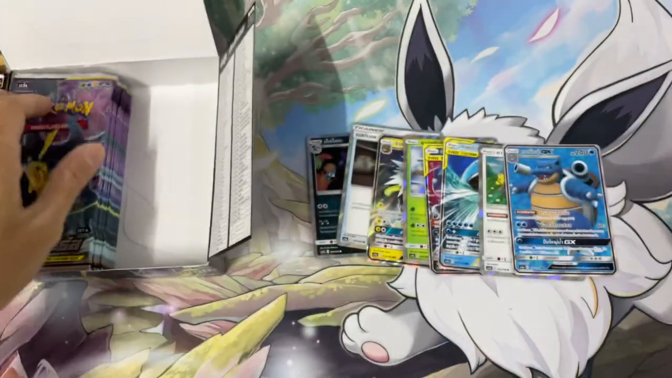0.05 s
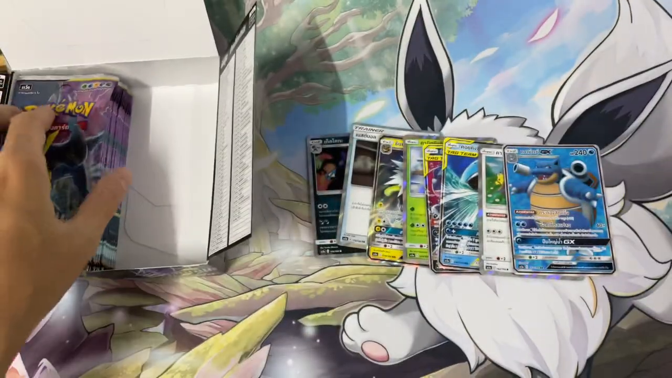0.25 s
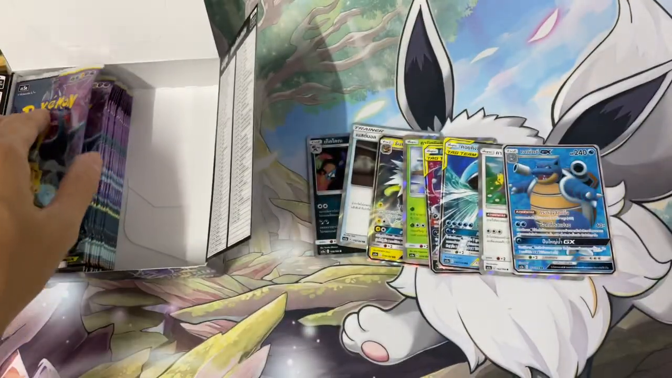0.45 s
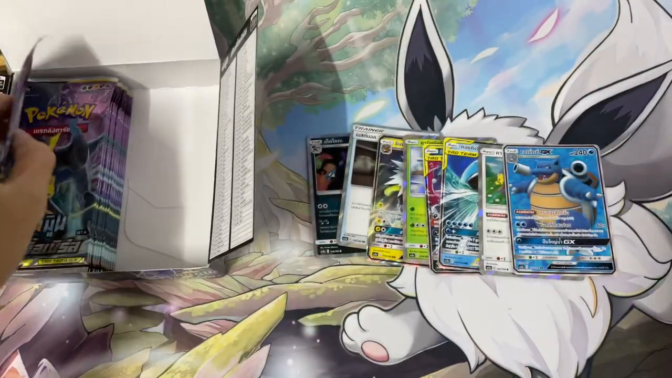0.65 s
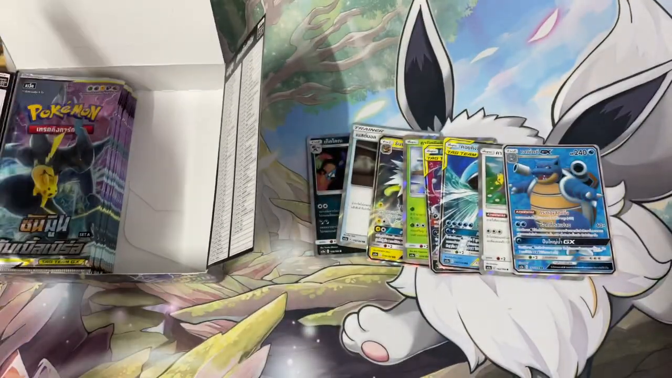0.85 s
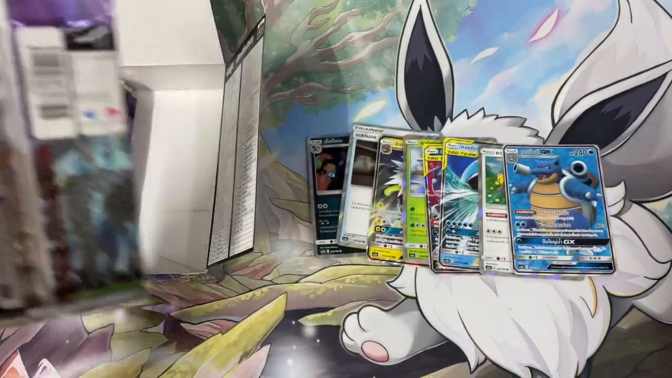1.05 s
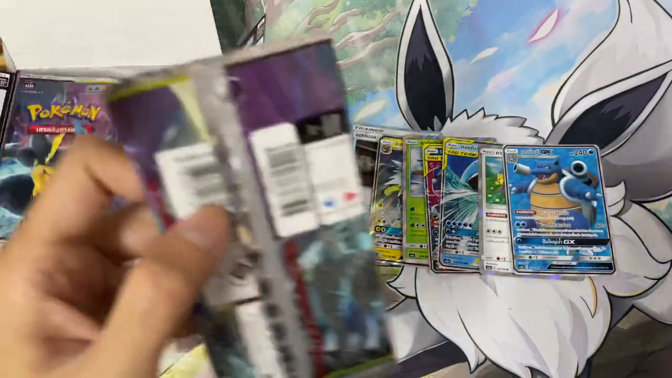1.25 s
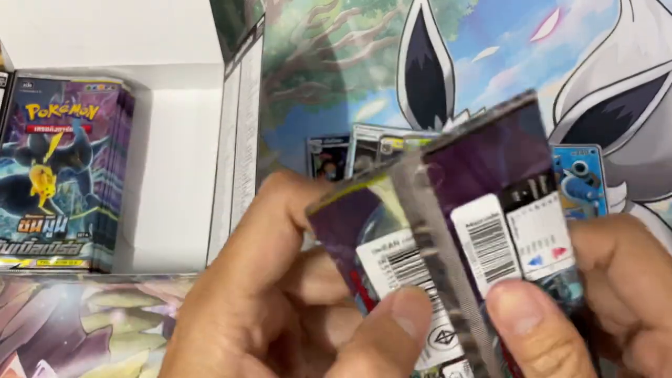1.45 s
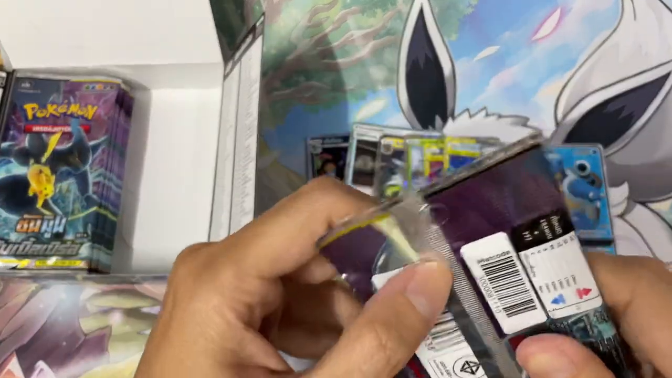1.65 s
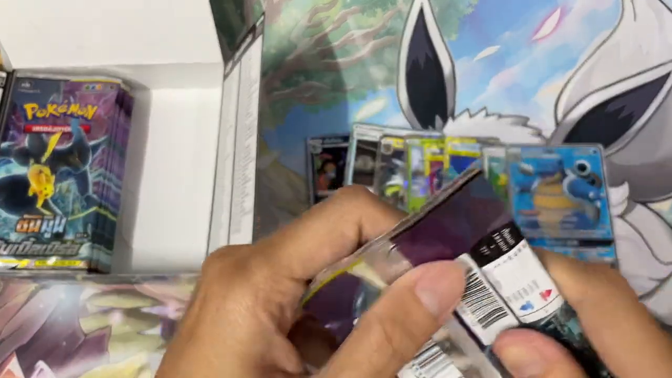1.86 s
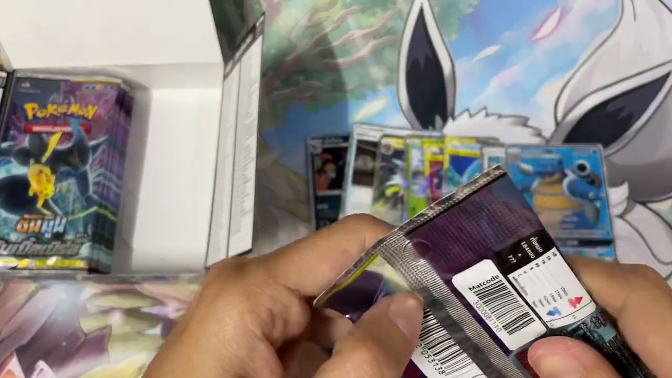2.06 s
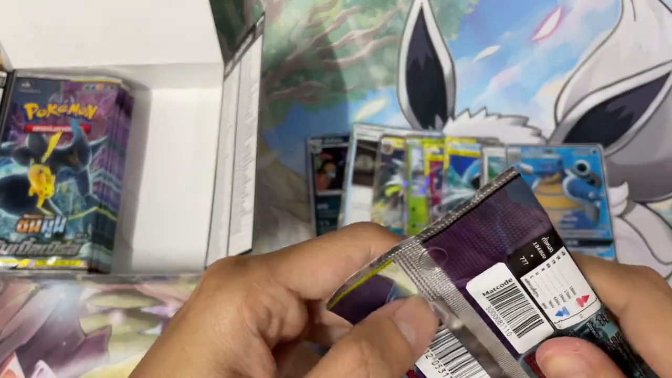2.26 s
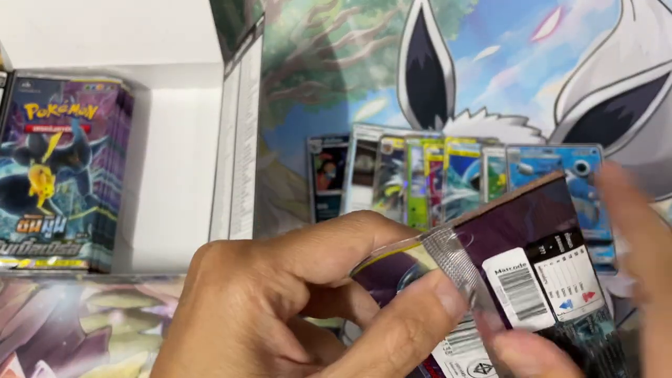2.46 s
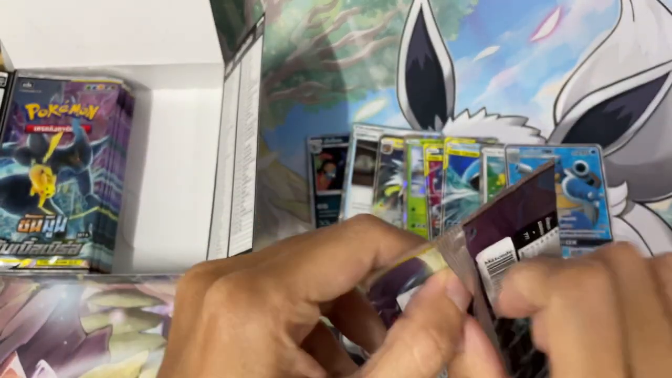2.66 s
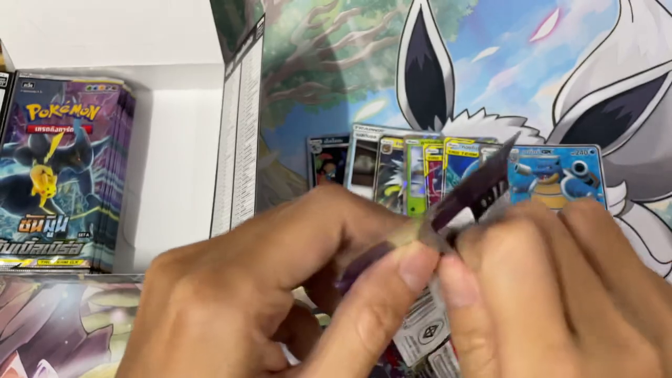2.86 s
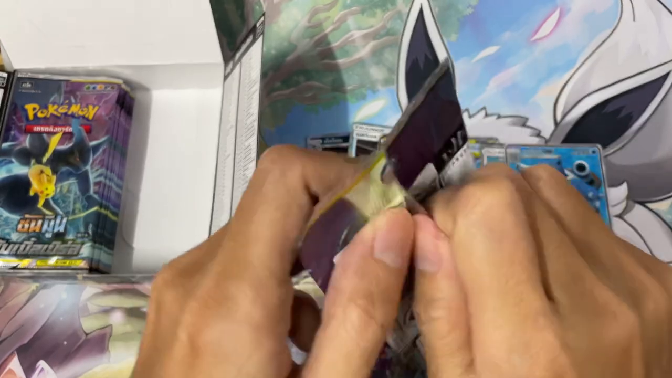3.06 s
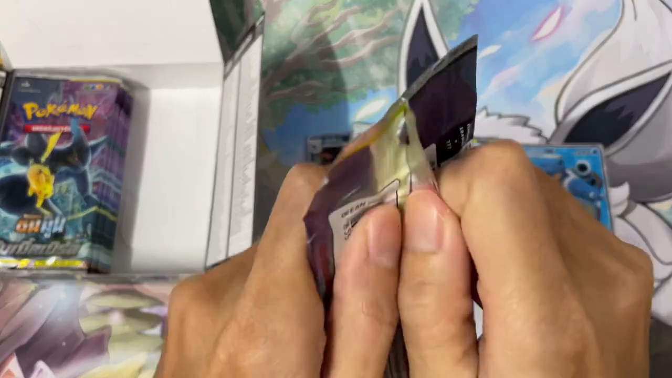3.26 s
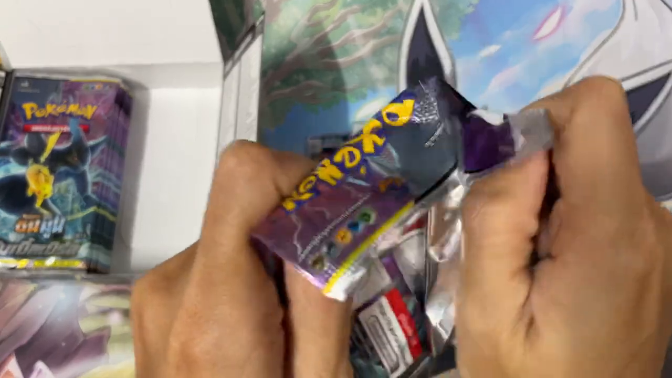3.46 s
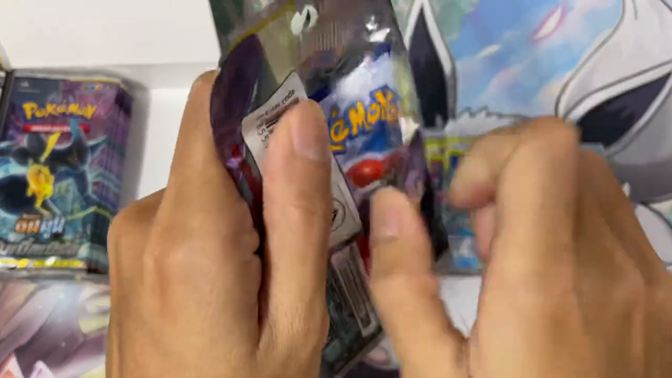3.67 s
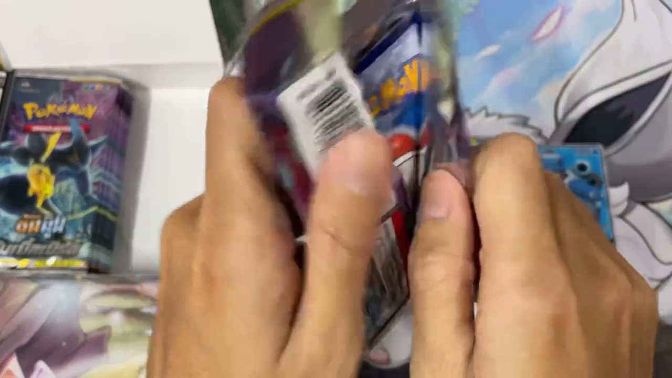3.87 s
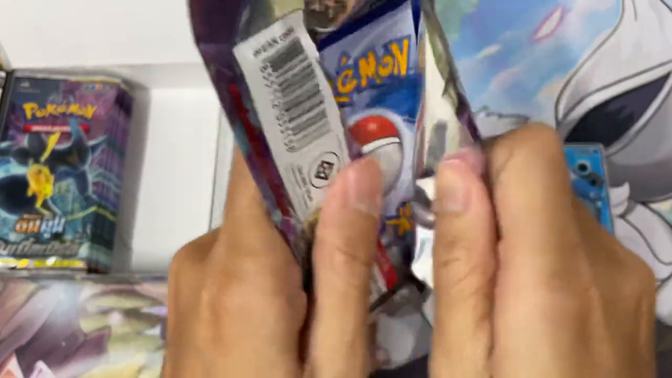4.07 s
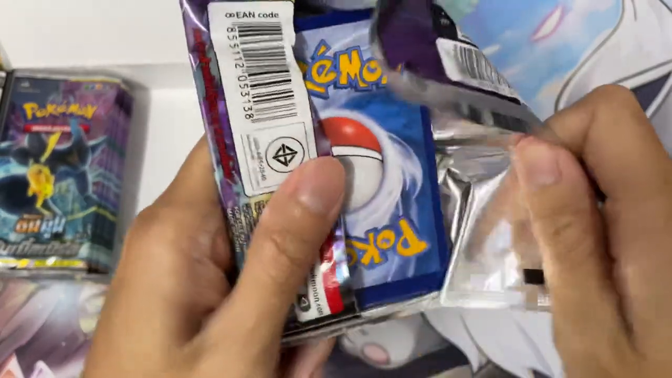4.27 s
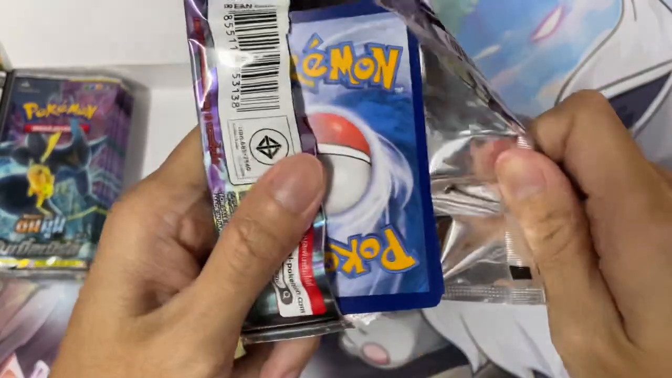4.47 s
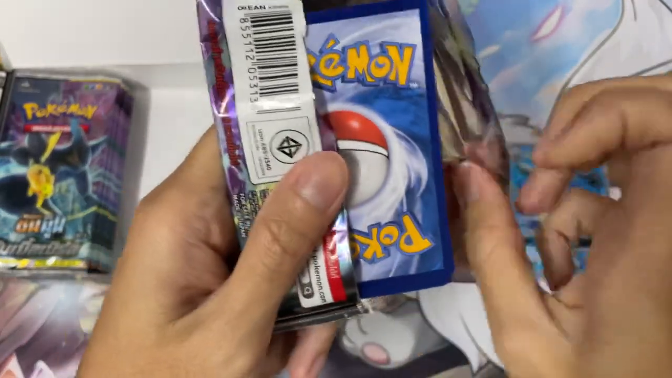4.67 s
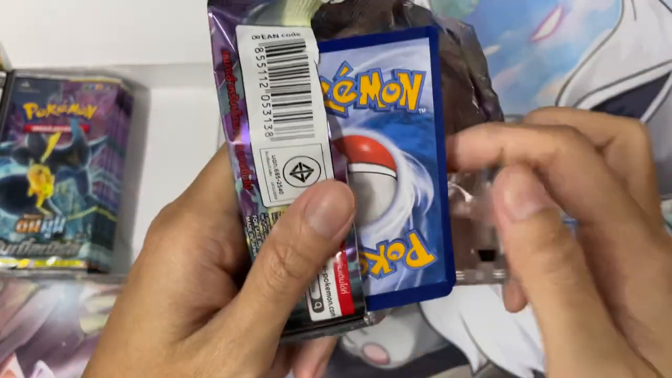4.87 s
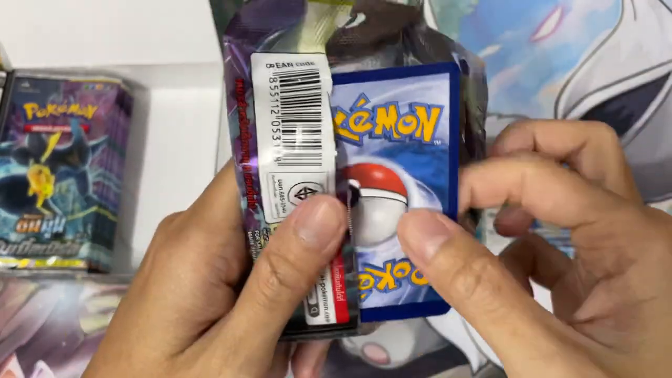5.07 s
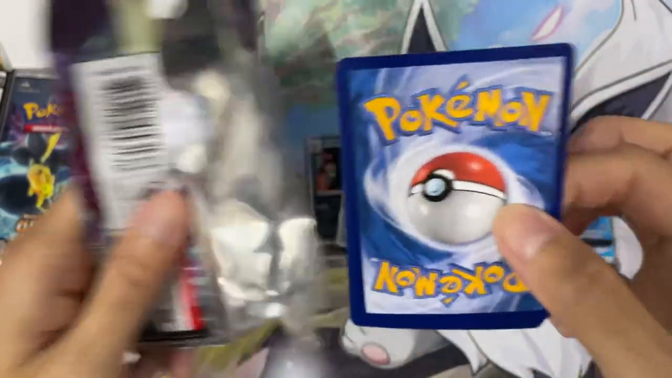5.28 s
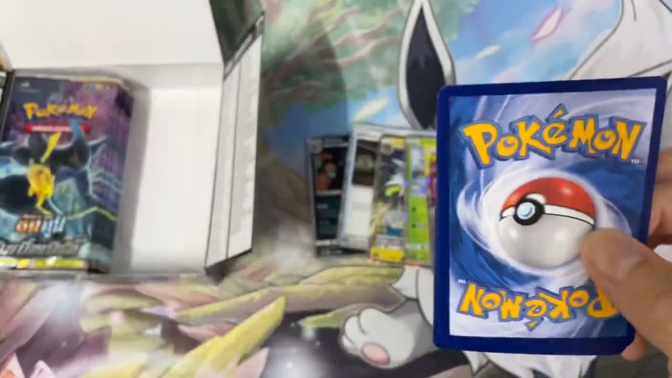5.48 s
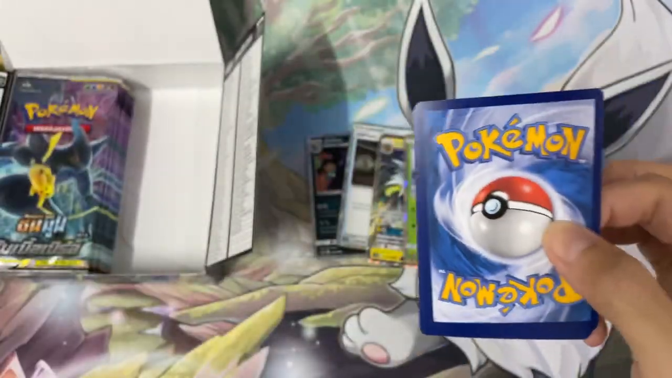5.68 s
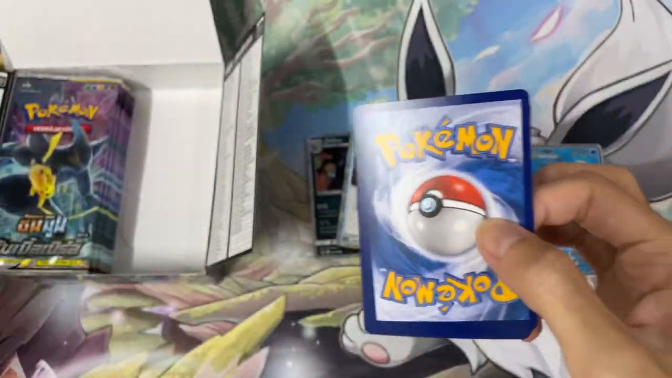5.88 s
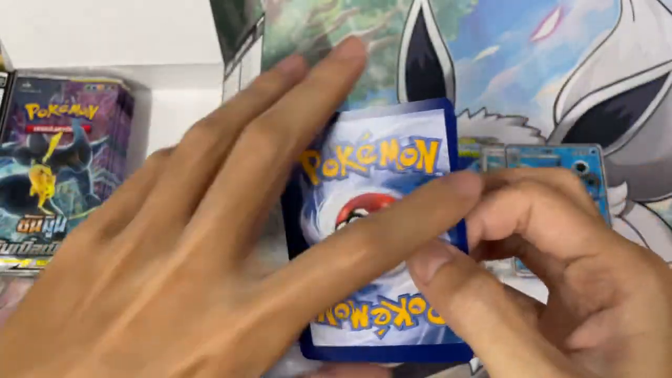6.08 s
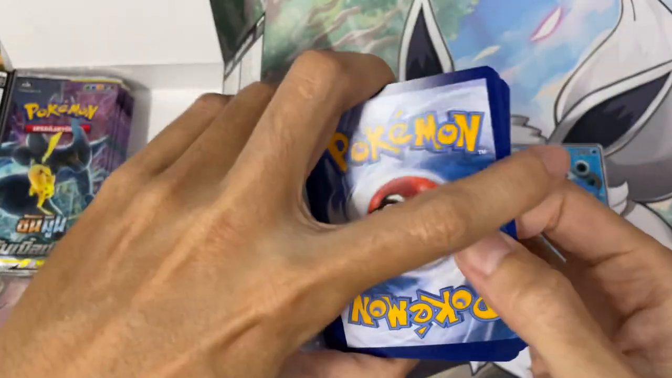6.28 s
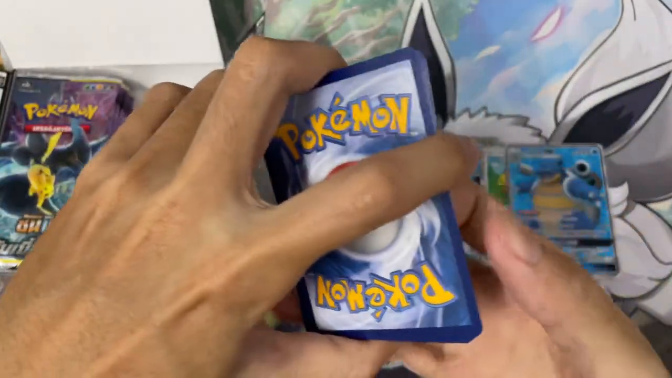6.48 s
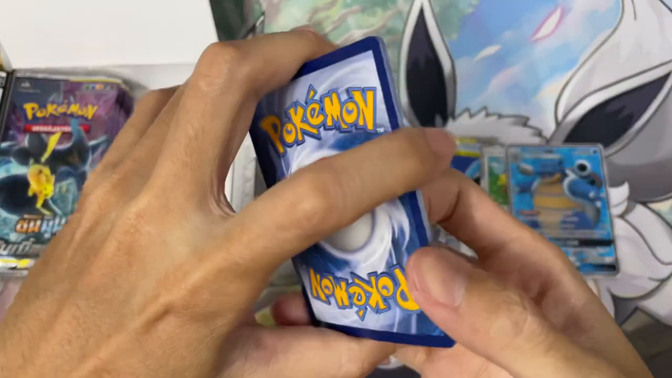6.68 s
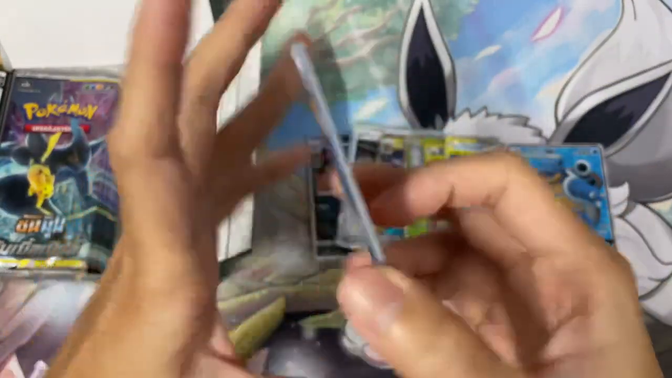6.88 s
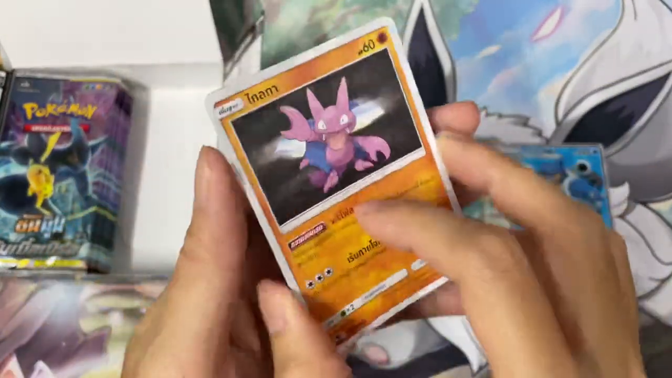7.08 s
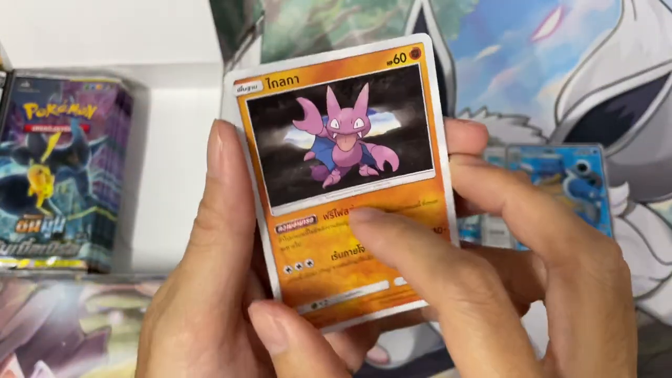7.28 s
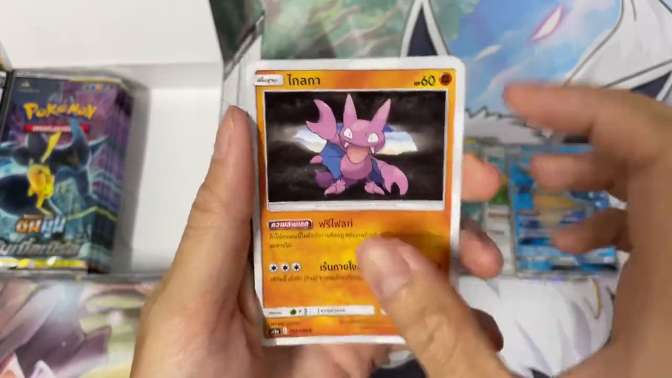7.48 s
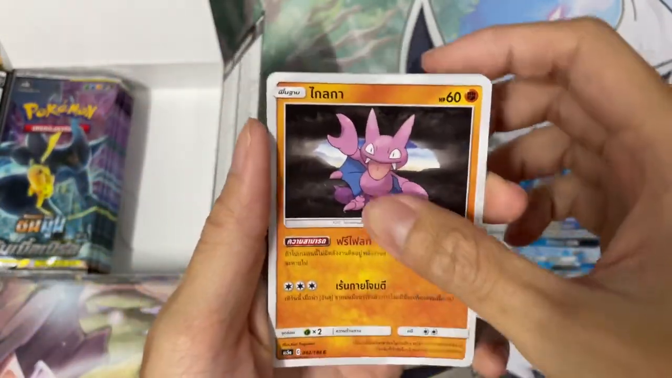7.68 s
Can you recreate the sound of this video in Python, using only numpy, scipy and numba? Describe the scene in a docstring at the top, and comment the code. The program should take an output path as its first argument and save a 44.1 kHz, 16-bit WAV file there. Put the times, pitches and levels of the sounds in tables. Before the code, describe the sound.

A quiet small room, heard very close through a stereo phone microphone, with low ventilation rumble and a faint wavering hum throughout. From 0.1 to 0.75 s foil gives a few light crackles, one sharper at 0.4, then near silence with soft low bumps. From 1.45 s crisp snaps return, with bright pops around 1.57, 1.82, 2.35 and 2.88. They thicken at 3.2, and the seam rips in a bright, dense crackle at 3.35-3.5. Looser crumpling follows until a louder, lower tear at 4.1-4.2. Clusters of snaps with dull card-stack thuds and creaks run to about 4.65, with low air puffs bumping the microphone. Separate hard cracks land at 4.9 and 5.16, then the foil dies away by 5.35. A card edge ticks and slides at 5.75; faint slips follow at 6.1-6.8, with a soft papery patter near 7.3 and weak brushing until 7.7.

```python
"""A low ventilation rumble and a mains hum lie under the first crinkles of a foil card wrapper in the hands.
Creases buckle in clusters of damped snaps over a dense rustle of tiny ones, and the card stack thuds.
The seam tears in bursts of bright crackle; at the end cards slide with ticks and a patter of slips.
Soft one-cycle puffs bump the microphone, and decaying noise tails make the small room and near echoes.
Everything is heard close up, through the two ports of a phone microphone."""
import sys
import numpy as np
from scipy import signal
from scipy.fft import rfft, irfft
from scipy.io import wavfile
from scipy.ndimage import uniform_filter1d
from numba import njit

SR = 44100
rng = np.random.default_rng(int(sys.argv[2]) if len(sys.argv) > 2 else 0)


def file_out(sig):
    """Save sig as 16-bit WAV at sys.argv[1]."""
    # one column per channel
    cols = np.atleast_2d(sig).T
    # limit, then scale
    lim = np.clip(cols, -1, 1)
    pcm = np.round(lim * 32767).astype(np.int16)
    wavfile.write(sys.argv[1], SR, pcm)


N = 341025


def undb(db):
    """Gain of a level in dB."""
    return 10 ** (np.asarray(db) / 20)


def across(table, size):
    """A (Hz, value) table read on a log pitch axis at every bin of a transform of this size."""
    hz, value = np.transpose(table)
    bin_hz = np.arange(size // 2 + 1) * SR / size
    return np.interp(np.log(bin_hz + 1), np.log(hz + 1), value)


def along(table, column):
    """A column of a table of times in seconds, read at every sample."""
    return np.interp(np.arange(N) / SR, np.array(table)[:, 0], np.array(table)[:, column])


def patchy(depth, rate):
    """Random levels held for 1 / rate seconds, with slewed steps between them."""
    hold = int(SR / rate)
    levels = np.repeat(rng.standard_normal(N // hold + 1), hold)[:N]
    return depth * uniform_filter1d(levels, hold // 2)


# How alike diffuse sound is at the two ports. Each row: pitch in Hz, likeness from 0 to 1.
PORT_LIKENESS = [(60, .72), (130, .9), (290, .8), (600, .55), (3000, .4), (5000, .85), (15000, .9)]


def diffuse(size):
    """Spectra of two noises that share part of each band, as diffuse sound does at the two ports."""
    alike = np.clip(across(PORT_LIKENESS, size), 0, 1)
    mid, side = rfft(rng.standard_normal((2, size)))
    opposed = np.array([[1], [-1]])
    return (np.sqrt(1 + alike) * mid + np.sqrt(1 - alike) * side * opposed) / np.sqrt(2)


# Colour of the ventilation noise. Each row: pitch in Hz, relative level in dB.
AIR_COLOUR = [(25, -25.5), (45, 1.5), (65, 4.5), (170, 4.5), (215, 0.5), (400, -3), (500, 3.5), (600, -8),
              (1020, -4.5), (1200, -13), (1450, -10.5), (1750, -21.5), (2500, -23.5), (3100, -32),
              (4000, -41), (10000, -47.5), (15000, -53)]
# Level of the hum over time. Each row: time in seconds, mean RMS level in dB.
HUM_LEVEL = [(0, -60), (2, -60.5), (2.6, -66.5), (5, -58), (5.4, -52.5), (7.73, -56)]
AIR_DB, HUM_HZ = -48.5, 99.8  # both waver around these


def room_tone():
    """Coloured diffuse noise that swells a little, and a sine hum that wavers in pitch and level."""
    air = irfft(diffuse(N) * undb(across(AIR_COLOUR, N)), N)
    turns = np.cumsum(HUM_HZ + patchy(depth=1.2, rate=4.6)) / SR
    hum_db = along(HUM_LEVEL, 1) + patchy(depth=2.95, rate=8.2)
    hum = np.sqrt(2) * np.sin(2 * np.pi * turns) * undb(hum_db)
    air_gain = undb(AIR_DB + patchy(depth=1.0, rate=8)) / air.std()
    return air * air_gain + hum


NEAR_T60, NEAR_DB = 0.012, -10  # decay in seconds; level in dB against the direct sound


def near_echoes(size):
    """Scattered echoes of desk, box and hands: a few milliseconds of noise, partly alike at the ports."""
    t = np.arange(size) / SR
    fade_in = np.clip(t / 0.0084, 0, 1)
    echoes = irfft(diffuse(size), size) * undb(-60 * t / NEAR_T60) * fade_in
    return echoes * undb(NEAR_DB) / np.sqrt(np.mean(np.sum(echoes ** 2, 1)))


# How long the room rings. Each row: pitch in Hz, time to fall 60 dB in seconds.
ROOM_DECAY = [(300, .45), (2000, .45), (6000, .4), (14000, .25)]
ROOM_DB = -17.5  # against the direct sound


def room(x, size):
    """The walls return a diffuse tail, built from octave bands of noise, with the treble dying first."""
    t = np.arange(size) / SR
    noise, tail = diffuse(size), 0
    decay_hz, decay_s = np.array(ROOM_DECAY).T
    octave = np.log2(np.arange(size // 2 + 1) * SR / size / 150 + 1e-9)
    for k, hz in enumerate(150 * 2. ** np.arange(7)):
        t60 = np.interp(np.log(hz), np.log(decay_hz), decay_s)
        band = np.clip(1 - np.abs(np.minimum(octave, 6) - k), 0, 1)
        tail = tail + irfft(noise * band, size) * undb(-60 * t / t60)
    tail = tail * np.clip(t / 0.004, 0, 1)  # fades in over 4 ms
    tail = tail * undb(ROOM_DB) / np.sqrt(np.mean(np.sum(tail ** 2, 1)))
    return signal.fftconvolve(x, tail + near_echoes(size), axes=1)[:, :N]


@njit
def ring(size, start, pole, gain, turn):
    """Each snap is one damped ring, cut off some 50 dB down and turned apart in phase at the two ports."""
    out = np.zeros((2, size))
    for k in range(len(start)):
        z, i = gain[k] + 0j, start[k]
        while i < size and abs(z) > abs(gain[k]) / 300:
            z *= pole[k]
            out[0, i] += (z * turn[k]).imag
            out[1, i] += (z / turn[k]).imag
            i += 1
    return out


SNAP_SPREAD = .45  # radians between the ports per unit of spot, for short waves


def snaps(s, hz, cycles, energy, spot):
    """Rings of given energy (amplitude squared times seconds); spot says where each one sits."""
    s, hz, cycles, energy, spot = [np.ravel(v) if np.ndim(v) else v for v in (s, hz, cycles, energy, spot)]
    hz = np.clip(hz, 25, .4 * SR)
    tau = cycles / hz
    pole = np.exp((2j * np.pi * hz - 1 / tau) / SR)
    sign = rng.choice([-1., 1.], len(s))
    # long waves reach both ports more alike
    apart = SNAP_SPREAD * spot * np.clip(hz / 2000, .35, 1)
    gain = sign * 2 * np.sqrt(energy / tau)
    return ring(N, (s * SR).astype(np.int64), pole, gain, np.exp(.5j * apart))


# Air pushed at the phone by the hands. Each row: start in seconds, level in dB, centre pitch in Hz.
AIR_PUFFS = [(0.684, -41, 200), (.765, -48, 66), (1.165, -47, 50), (1.436, -46, 80), (2.884, -42, 104.6),
             (3.87, -44, 70), (3.975, -42, 70), (4.117, -36.5, 66), (4.363, -38, 66), (4.409, -38.5, 66),
             (4.65, -39, 60), (4.919, -31.5, 66), (5.03, -36, 66), (5.17, -40, 66)]


def puffs(count=4):
    """Low soft bumps: each is a few fading one-cycle pushes, unlike at the two ports."""
    s, db, hz = np.array(AIR_PUFFS).T[:, :, None]
    late, pitch, spot = rng.standard_normal((len(AIR_PUFFS), count, 3)).transpose(2, 0, 1)
    push = np.arange(count)
    when = s + 0.8 / hz * (push + 0.27 * late)
    energy = undb(2 * db) / hz * np.exp(-.6 * push)
    bumps = snaps(when, hz * np.exp(.3 * pitch), 1.0, energy, 5 * spot)
    return uniform_filter1d(bumps, int(0.0012 * SR))  # softens the onsets


# Cards sliding over each other, an edge catching first.
# Each row: start in seconds, length in ms, level in dB, centre pitch in Hz, tick level in dB.
CARD_SLIDES = [(5.7439, 67, -50, 5556, -39), (6.099, 68, -66.5, 7970, -49.5),
               (6.4074, 49, -67.5, 8000, -58), (6.4748, 20.5, -66, 2380, -57), (6.76, 70, -65.5, 8000, -62),
               (7.082, 22, -64.5, 9000, -58), (7.18, 30, -64.5, 9000, -65), (7.229, 45, -58.5, 7600, -70),
               (7.24, 30, -58, 2100, -70), (7.296, 62, -60.5, 2480, -64), (7.2954, 41, -53, 8040, -60),
               (7.529, 143, -66, 2200, -69.5), (7.67, 78, -61.5, 9700, -72)]
TICK_MS = 7.6


def slides(count=700):
    """Each slide is a tick, then a smooth patter of tiny slips that swells quickly and fades."""
    s, ms, db, hz, tick_db = np.array(CARD_SLIDES).T[:, :, None]
    late = rng.uniform(0, 3, (len(CARD_SLIDES), count)) ** 2 / 3  # in slide lengths
    swell = (late / .2) ** 2.5 / (1 + (late / .2) ** 2) * np.exp(-3 * late)
    tick = np.exp(-(late * ms / TICK_MS) ** 2)
    panel, spot = rng.standard_normal((len(CARD_SLIDES), count, 2)).transpose(2, 0, 1)
    # low scrapes ring the card itself on a narrow pitch, high ones hiss widely
    sharp = 8000 / hz * np.ones(count)
    pitch = hz * np.exp(0.47 * panel / sharp)
    patter_energy = undb(2 * db) * ms / 1000 * swell / swell.sum(1, keepdims=True)
    tick_energy = undb(2 * tick_db) * TICK_MS / 1000 * tick / tick.sum(1, keepdims=True)
    return snaps(s + late * ms / 1000, pitch, 0.3 * sharp ** 2, patter_energy + tick_energy, spot)


def crinkle(db, hz, spread, cycles, scatter_db, count):
    """Countless small snaps at random moments, two panels at a time; most are faint, a few stand out."""
    pair_s = rng.uniform(0, N / SR - .01, count // 2)
    s = np.repeat(pair_s, 2) + rng.exponential(.0006, count)
    at = (s * SR).astype(int)
    panel, spot = rng.standard_normal((2, count))
    share = undb(2 * scatter_db * np.repeat(rng.exponential(1, count // 2), 2))
    energy = undb(2 * db[at]) * share / share.sum() * N / SR
    # the folds change size under the fingers, so the colour shifts
    fold = patchy(depth=.3, rate=45)[at]
    return snaps(s, hz * np.exp(fold + spread * panel), cycles, energy, spot)


# Once the pack is open the card stack flexes in the grip.
# Each row: time in seconds, level in dB at a -40 dB rustle.
STACK_FLEX = [(3.2, -59), (3.6, -48), (4.2, -49), (4.3, -40.5), (4.68, -46.5), (4.8, -56), (5.4, -47)]
FLEX_PER_DB = 0.55  # dB of flex per dB of rustle


def flex(rustle_db, fits):
    """The bending stack creaks in low snaps that follow the rustle, within the span of its table."""
    t = np.arange(N) / SR
    gripped = (t > STACK_FLEX[0][0]) & (t < STACK_FLEX[-1][0])
    flex_db = along(STACK_FLEX, 1) + FLEX_PER_DB * (rustle_db + 40)
    level_db = np.where(gripped, flex_db + fits, -120)
    return crinkle(level_db, 550, .6, 1.8, 2.2, count=6000)


def gestures(start, hold, db, rise_db_s, fall_db_s):
    """Summed power, each millisecond, of gestures that rise to their start, hold and fall."""
    t = np.arange(N * 1000 // SR + 2)[:, None] / 1000
    before, after = np.maximum(start - t, 0), np.maximum(t - start - hold, 0)
    return np.sum(undb(2 * (db - rise_db_s * before - fall_db_s * after)), 1)


# Fingers pressing or shifting on the foil.
# Each row: start in seconds, hold in seconds, rustle level in dB, treble sizzle level in dB.
FINGER_GRIPS = [(0.0, 0.021, -52, -63), (0.123, 0.014, -54.5, -61.5), (0.302, 0.023, -46.5, -47),
                (0.404, 0.06, -41.5, -63), (0.495, 0.041, -43.5, -53), (0.721, 0.032, -50.5, -55.5),
                (0.806, 0.018, -55, -54), (0.958, 0.19, -71, -65.5), (1.404, 0.033, -59.5, -63),
                (1.444, 0.1, -57.5, -58.5), (1.696, 0.055, -45, -52), (1.855, 0.051, -48, -49),
                (2.123, 0.02, -59, -65), (2.277, 0.13, -53, -55), (2.555, 0.014, -50.5, -50),
                (2.843, 0.064, -45, -43.5), (3.049, 0.045, -51, -53.5), (3.241, 0.02, -43.5, -53),
                (3.594, 0.092, -45.5, -47.5), (3.69, 0.027, -37.5, -50), (3.86, 0.14, -49, -62),
                (4.052, 0.045, -39, -52), (4.147, 0.0074, -36.5, -45), (4.284, 0.083, -42.5, -61.5),
                (4.40, 0.073, -46.5, -66), (4.754, 0.018, -47.5, -52.5), (4.87, 0.092, -56, -62),
                (5.024, 0.016, -41, -55.5), (5.117, .05, -66, -48), (5.176, 0.01, -35, -40.5),
                (5.293, 0.098, -58, -79)]
GRIP_RISE_DB_S, GRIP_FALL_DB_S = 350.5, 191
SETTLE_RISE_DB_S, SETTLE_FALL_DB_S = 5000, 299.5


def handling(column, settle_db):
    """Level in dB of the small crackle: grips, tears and the foil settling after each crack."""
    grip, tear, crack = np.array(FINGER_GRIPS).T, np.array(SEAM_TEARS).T, np.array(CREASES).T
    power = (gestures(grip[0], grip[1], grip[column], GRIP_RISE_DB_S, GRIP_FALL_DB_S)
             + gestures(tear[0], tear[1], tear[column], TEAR_RISE_DB_S, TEAR_FALL_DB_S)
             + gestures(crack[0], 0, crack[1] + settle_db, SETTLE_RISE_DB_S, SETTLE_FALL_DB_S))
    level_db = 10 * np.log10(power + 1e-14)
    return np.interp(np.arange(N) / SR * 1000, np.arange(len(power)), level_db)


def rustle(rustle_db, fits):
    """The body of the foil noise: dense mid-pitched snaps on panels of widely spread size."""
    return crinkle(rustle_db + fits, 2824, .62, 2.8, 1.6, count=20000)


def sizzle(sizzle_db, fits):
    """The treble of the foil noise: a denser spray of high snaps that die within about a cycle."""
    return crinkle(sizzle_db + fits, 9000, 0.38, 0.94, 2.7, count=40000)


# The seam ripping open.
# Each row: start in seconds, hold in seconds, rustle level in dB, treble sizzle level in dB.
SEAM_TEARS = [(3.365, 0.047, -22.5, -28), (3.408, 0.054, -20, -27), (4.12, 0.0083, -16, -33),
              (4.14, .04, -32, -46)]
TEAR_RISE_DB_S, TEAR_FALL_DB_S = 1200.5, 560


def rip(fits):
    """The seam's fibres part with a brighter, sharper crackle, just below the tear's sizzle level."""
    start, hold, _, sizzle_db = np.array(SEAM_TEARS).T
    power = gestures(start, hold, sizzle_db - 1.5, TEAR_RISE_DB_S, TEAR_FALL_DB_S)
    seam_db = 10 * np.log10(power[np.arange(N) * 1000 // SR] + 1e-14)
    return crinkle(seam_db + fits, 4800, 0.2, 2.7, 2.5, count=20000)


# Creases that buckle. Each row: start in seconds, level in dB, centre pitch in Hz,
# nominal length in ms, card-stack thud in dB against the crack.
CREASES = [(0.1273, -38, 2700, 4.1, -7), (0.26, -44.5, 3570, 6.8, -1), (0.285, -44, 5860, 8.2, -12),
           (0.343, -41.5, 1400, 14.5, -4), (0.3933, -23, 2730, 4.3, -14), (0.401, -37, 5200, 5, -14),
           (0.411, -35.5, 5000, 3.8, -15), (0.435, -40, 4200, 4.7, -8), (0.5003, -39, 3200, 4.4, -4),
           (0.5089, -36, 2100, 4.7, -3), (0.5221, -33, 3100, 11.3, 0), (0.535, -36.5, 1480, 7.1, 0.5),
           (0.5934, -43, 6100, 2.3, -20), (0.659, -42.5, 6840, 4.2, -20), (0.6786, -41, 1300, 6, 5),
           (0.74, -38.5, 4410, 13, -6), (1.451, -44, 3800, 3.6, -15), (1.4986, -40, 1800, 6.1, -10),
           (1.53, -40.5, 3180, 3.1, -6), (1.5566, -25, 4390, 5.5, -11), (1.5718, -16, 7000, 1.67, -32),
           (1.6211, -29, 4900, 5, -14), (1.657, -37.5, 4500, 3.7, -15), (1.824, -20, 5320, 3.34, -12),
           (1.866, -31, 7500, 4.7, -19), (1.908, -32.5, 1910, 4.3, -1.5), (2.1016, -31, 4300, 1.28, -19),
           (2.224, -31.5, 8780, 3, -5), (2.293, -20.5, 6600, 3.74, -10.5), (2.303, -33.5, 6200, 5.9, -17),
           (2.343, -13.5, 5990, 1.71, -28.5), (2.346, -17.5, 6030, 2.25, -36),
           (2.3765, -38, 5000, 3.4, -18.5), (2.407, -17.5, 5700, 2.96, -12.5),
           (2.435, -39.5, 4230, 4.6, -11), (2.611, -43.5, 4230, 3.7, -10), (2.693, -45.5, 4110, 5.1, -15.5),
           (2.7094, -20, 9580, 1.9, -25.5), (2.792, -40.5, 3500, 4.7, -12), (2.8328, -23, 5600, 4.4, -9),
           (2.87, -25.5, 4840, 3.6, -22.5), (2.8791, -11, 6140, 4.56, -6), (3.02, -39.5, 5500, 3.2, -16.5),
           (3.0492, -21.5, 7220, 3.2, -24), (3.0975, -32, 2268, 2.7, -1), (3.187, -41.5, 3417, 3.7, -15),
           (3.2229, -16.5, 5490, 3.1, -2), (3.2298, -23, 4380, 7.2, -14.5), (3.259, -10, 8500, 1.75, -25.5),
           (3.2727, -12, 6450, 2.13, -28), (3.341, -29.5, 4320, 4.1, -17), (3.349, -21.5, 5010, 3.2, -23.5),
           (3.353, -14.5, 5330, 8.4, -27), (3.359, -12, 6000, 4.8, -18), (3.385, -22.5, 1800, 1.7, -5),
           (3.414, -17, 5440, 3.1, -21), (3.428, -12.5, 3614, 2.8, -16), (3.444, -16, 4360, 7.5, -20),
           (3.452, -19, 5510, 3.2, -20.5), (3.4645, -27, 3200, 3.3, -15.5),
           (3.475, -17.5, 4290, 2.2, -23.5), (3.4868, -25, 3490, 3, -13.5), (3.505, -35, 1700, 5.2, -13.5),
           (3.52, -33, 2240, 7.6, -8), (3.553, -34, 2500, 4.6, -9), (3.5779, -19, 4360, 2.16, -17),
           (3.585, -22.5, 2500, 2.95, -16), (3.598, -31, 3520, 9.2, -2.5), (3.6169, -24.5, 4580, 2.8, -9),
           (3.627, -26, 5930, 1.6, 0), (3.641, -33.5, 5106, 7.8, -8.5), (3.6781, -31, 5500, 6.8, -22),
           (3.714, -36, 2720, 1.3, -21.5), (3.7301, -21, 4010, 4.6, -5), (3.7609, -16.5, 6680, 2.74, -33),
           (3.841, -23, 2237, 3.37, -12.5), (3.848, -29, 1679, 8.2, -14), (3.863, -34.5, 5445, 3, -14.5),
           (3.878, -24.5, 3820, 6.8, -5), (3.91, -35, 3940, 4.3, -21.5), (3.957, -21, 2474, 1.13, -7),
           (3.972, -38, 2700, 2.6, -11), (4.0108, -36, 3756, 3.2, -15), (4.0464, -25, 3450, 5, -4),
           (4.0643, -16, 3916, 3, -8.5), (4.0963, -18.5, 3600, 2.7, -10.5), (4.1021, -8, 2277, 5.8, -17),
           (4.1211, -12.5, 2904, 6.7, -4.5), (4.131, -10.5, 2940, 9.6, -3), (4.1857, -9.5, 2195, 3.44, -19),
           (4.1959, -22, 1567, 4.2, -1.5), (4.2059, -19, 6560, 3.8, -25.5), (4.2165, -32, 2530, 4.5, -13.5),
           (4.256, -24, 4370, 4.2, -18.5), (4.262, -31.5, 800, 5.8, 6), (4.274, -24.5, 2320, 4.85, 5),
           (4.2881, -29, 1800, 7, 6), (4.293, -29, 5200, 4.5, -11.5), (4.3016, -23, 2312, 4.9, -9.5),
           (4.308, -23.5, 5310, 3.6, -9.5), (4.315, -29, 2890, 4.93, 1.5), (4.321, -28, 4650, 9.4, -12.5),
           (4.329, -27.5, 4240, 4.6, -20.5), (4.3492, -20, 5450, 4.4, -6.5), (4.362, -14.5, 1864, 2.8, -18),
           (4.367, -26, 4160, 5, -4), (4.3886, -25, 3500, 6.3, 7.5), (4.406, -30, 3130, 3, -6),
           (4.44, -28, 2630, 3, -16), (4.4468, -15, 2600, 2.2, -24), (4.457, -12.5, 2820, 3.58, 3),
           (4.6005, -25, 2200, 1.3, 2), (4.605, -24, 6280, 4.2, -14.5), (4.614, -10.5, 3380, 3.6, -4.5),
           (4.625, -27, 4500, 7.9, -2.5), (4.6383, -27.5, 2790, 5.3, 7), (4.6747, -30, 1760, 3.2, -3.5),
           (4.7758, -34, 2954, 3.5, -8), (4.905, -13.5, 5000, 3.4, -37), (4.9336, -30.5, 2230, 8.2, 3),
           (5.039, -27, 3745, 8.3, -34), (5.164, -9.5, 2878, 5.76, -12.5), (5.2, -37, 2640, 9.7, -4.5),
           (5.216, -33.5, 5420, 5.1, -4), (5.28, -40, 5100, 8, -6.5), (5.3436, -33, 4320, 1.8, -13) ]
FOIL_DOWN, FOIL_UP = .52, .7  # log pitch spread of the panels below and above the centre
FOIL_LAG_CYCLES, STACK_LAG_CYCLES = 1.2, 1.596  # delay in periods
STACK_HZ, STACK_TILT_DB = 438, 2  # centre pitch; dB per step up in pitch


def cracks(count=48):
    """A buckling crease runs along the foil as a cluster of snaps on panels of many sizes."""
    s, db, hz, ms, thud_db = np.array(CREASES).T[:, :, None]
    when, panel, size, spot = rng.standard_normal((len(CREASES), count, 4)).transpose(2, 0, 1)
    run = .7 * ms / 1000
    # most snaps trail the onset, some come just before it
    late = np.where(when > -.6, np.abs(when) * .5, (when + .6) * .25)
    # every size takes part, the middle ones most
    panel = np.linspace(-2.2, 2.2, count) + .1 * panel
    share = undb(2 * (2.3 * size - 3.2 * np.abs(late))) * np.exp(-panel ** 2 / 2)
    energy = undb(2 * db) * run
    reach = np.clip((db + 62) / 34, .5, 1)  # a faint crease stirs fewer sizes of panel
    pitch = hz * np.exp(np.where(panel < 0, FOIL_DOWN, FOIL_UP) * panel * reach)
    # bending waves spread slower the lower they are, so big panels answer late
    lag = FOIL_LAG_CYCLES * (1 / pitch - 1 / hz)
    foil_energy = energy * share / share.sum(1, keepdims=True)
    foil = snaps(s + late * run + lag, pitch, 1.84, foil_energy, spot)
    return foil + thuds(s, run, energy * undb(2 * thud_db), late[:, :10], size[:, :10], spot[:, :10])


def thuds(s, run, energy, late, size, spot):
    """The stiff card stack inside answers each crack with a thud of ten rings that sweeps downwards."""
    step = np.linspace(-1.7, 1.7, 10) + .25 * size
    pitch = STACK_HZ * np.exp(0.551 * step)
    share = undb(2 * STACK_TILT_DB * step)
    when = s + STACK_LAG_CYCLES / pitch + np.abs(late) * run * .8
    return snaps(when, pitch, 0.84, energy * share / share.sum(1, keepdims=True), spot)


def hands():
    """All that the fingers set off, at the hands: foil, seam, card stack and sliding cards."""
    fits = patchy(depth=2.7, rate=150)  # dB; the foil gives way in fits
    rustle_db = handling(column=2, settle_db=-32.5)
    sizzle_db = handling(column=3, settle_db=-33)
    crackle = rustle(rustle_db, fits) + sizzle(sizzle_db, fits) + rip(fits)
    return slides() + flex(rustle_db, fits) + crackle + cracks()


# Colour of the path from hands to phone. Each row: pitch in Hz, gain in dB.
DESK_COLOUR = [(80, -9.5), (250, -7.5), (600, -4), (1050, -6.5), (1500, -3.5), (2500, -3.5), (4000, -6),
               (7000, -1.5), (11000, -2), (15600, -7.5), (16400, -14.5)]


def scene():
    """The hands through the desk colour, with their room tail, over puffs and room tone."""
    direct = irfft(rfft(hands()) * undb(across(DESK_COLOUR, N)), N)
    return room_tone() + puffs() + room(direct, size=16384) + direct


# Phase between the ports. Each row: pitch in Hz, lead of the left port in radians.
PORT_LEAD = [(1, 0), (950, -.7), (2150, .6), (5300, .6), (7100, 3.0), (8300, 3.3), (10200, 6.05),
             (12200, 6.6), (13300, 9.1), (14800, 9.7), (15800, 11.2)]
# Level between the ports. Each row: pitch in Hz, left minus right in dB.
PORT_LEVELS = [(60, 1), (200, 0.5), (400, 6), (800, 3), (1500, 0.5), (4400, -1.5), (15000, 0)]
TOP_HZ = 17200


def record(dry):
    """The two ports differ in phase and level by band; deep bass is cut, peaks rounded, the top cut."""
    half = np.exp(.5j * across(PORT_LEAD, N)) * undb(across(PORT_LEVELS, N) / 2)
    ports = irfft(rfft(dry) * np.array([half, 1 / half]), N)
    bass_cut = signal.butter(3, 40, "high", fs=SR, output="sos")
    top_cut = signal.ellip(16, .2, 130, TOP_HZ, fs=SR, output="sos")
    rounded = np.tanh(signal.sosfilt(bass_cut, ports))  # bends peaks towards full scale
    return signal.sosfilt(top_cut, rounded)


dry = scene()
out = record(dry)
file_out(out)
```